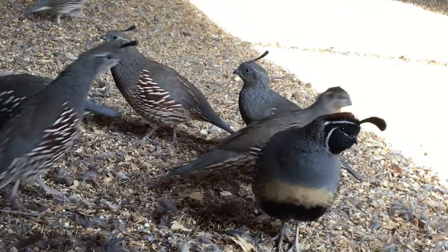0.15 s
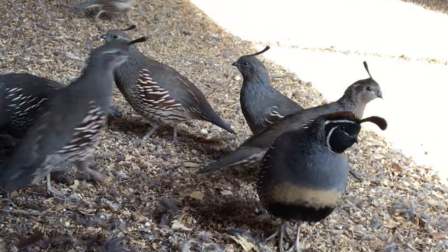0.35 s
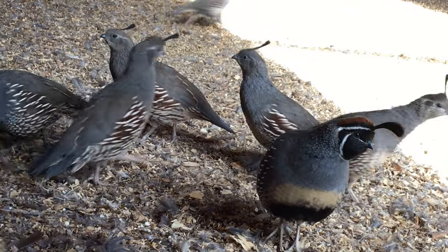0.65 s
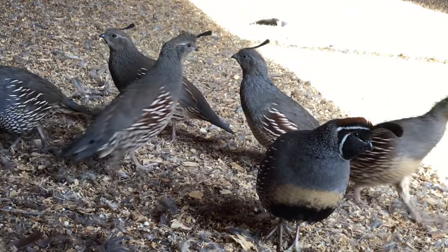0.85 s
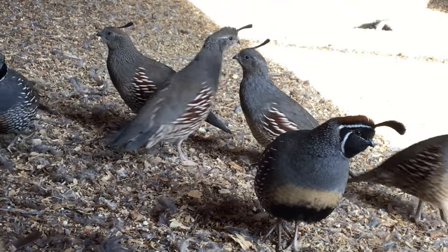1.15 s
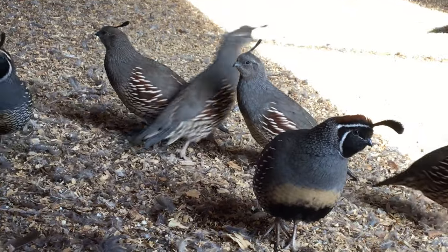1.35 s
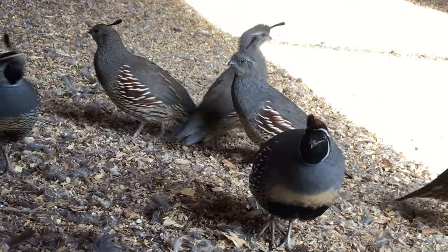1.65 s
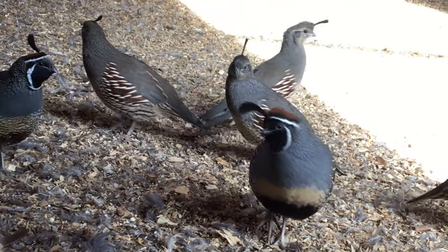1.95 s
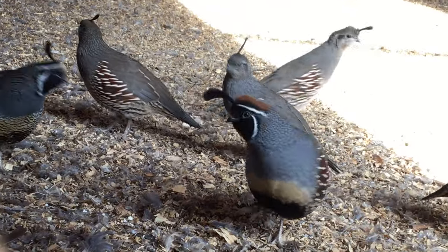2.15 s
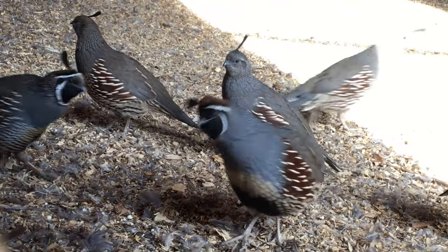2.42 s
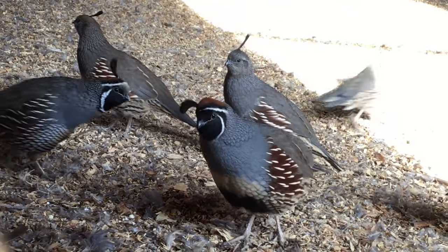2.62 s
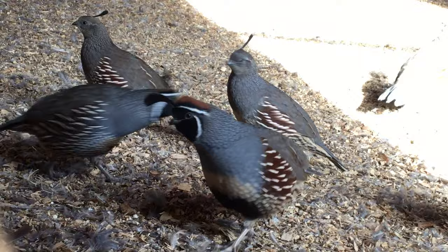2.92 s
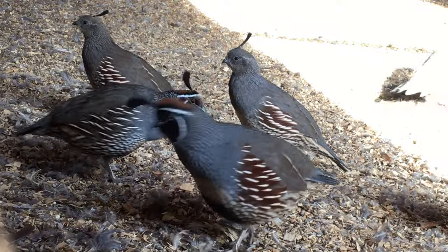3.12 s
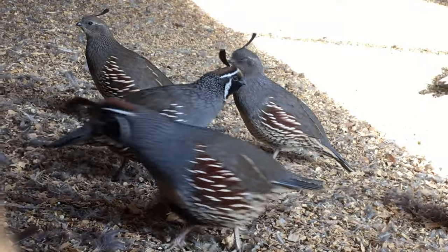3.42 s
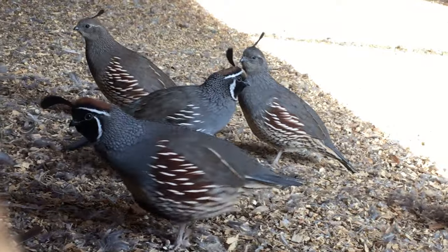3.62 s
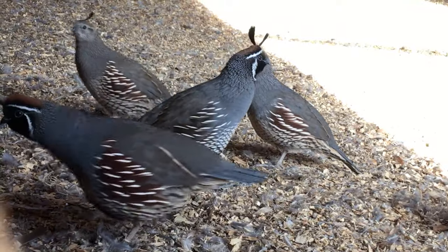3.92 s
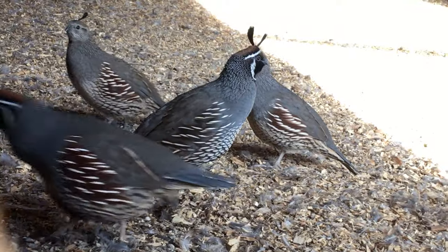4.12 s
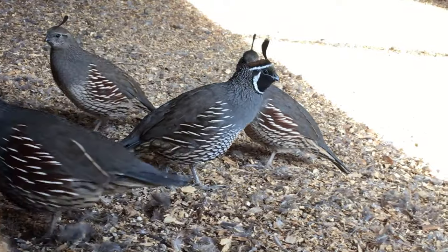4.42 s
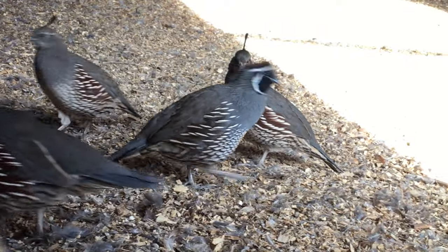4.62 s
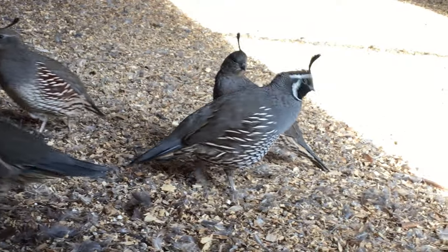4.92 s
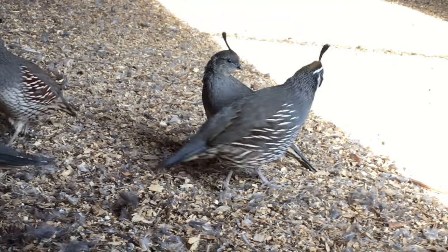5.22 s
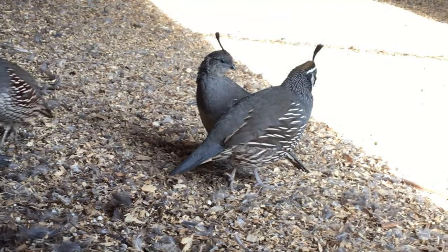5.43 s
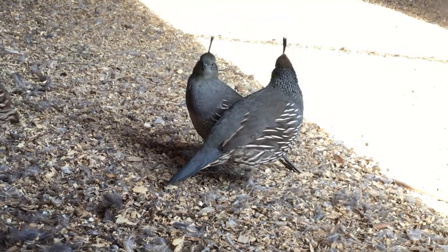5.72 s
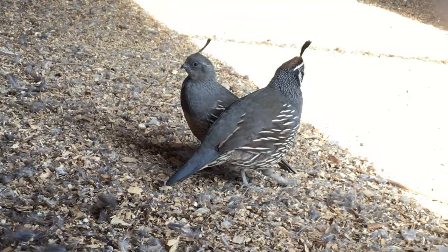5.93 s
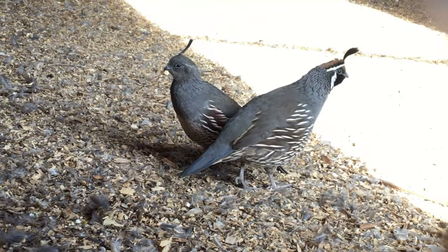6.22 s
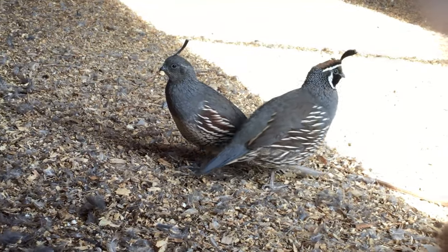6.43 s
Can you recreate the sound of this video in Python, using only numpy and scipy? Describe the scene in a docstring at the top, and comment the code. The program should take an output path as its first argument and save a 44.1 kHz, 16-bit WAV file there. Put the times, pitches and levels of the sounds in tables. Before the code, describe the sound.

Quail give nasal clucks, wails, yelps and harsh chips while stepping lightly on gravel, over a low rumble and hum.

```python
"""In a shelter, a covey of quail walks over gravel, above a low rumble and the hum of a far machine.
Each call is a source and a filter: a vibrating membrane makes harmonics, and throat and beak shape them.
The birds trade nasal clucks, climbing wails, two-humped yelps and faint squeaks; then one gives five
harsh chips that break up at their ends. Feet set pebbles ringing, near walls reflect calls and steps,
a few dull bumps sound, and a small bird whistles far off."""
import sys
import numpy as np
from scipy import signal
from scipy.fft import rfft, irfft, next_fast_len
from scipy.io import wavfile

SR = 44100
rng = np.random.default_rng(int(sys.argv[2]) if len(sys.argv) > 2 else 0)


def wav_record(signal):
    """Record a signal, one row per channel, as 16-bit PCM in the file named by sys.argv[1]."""
    frames = np.transpose(np.atleast_2d(signal))
    bounded = np.clip(frames, -1, 1)
    # unit amplitude maps onto the largest positive 16-bit level
    quanta = np.round(bounded * 32767).astype(np.int16)
    wavfile.write(sys.argv[1], SR, quanta)


N = 289719


# Wails: (time [s], length [s], start pitch [Hz], top pitch [Hz], bend of the climb [1 = straight],
# final drop [0-1], level [dB], softness [0-1], overtones [dB], beak ring [dB])
WAIL_NOTES = [(1.945, .198, 740.5, 871, 0.64, 0.067, -24.5, .02, -1.3, 4.5),
              (2.108, 0.17, 645, 768, 0.702, 0.44, -41.5, 0.97, -0.69, -15),
              (2.75, 0.18, 705, 869, .75, 0.32, -35, 0.72, 1.3, -40),
              (3.028, .222, 754.7, 927, 1.25, 0.338, -22.5, 0.014, -1, 6),
              (4.203, .243, 760, 961, 0.98, 0.37, -22, 0.034, -1.9, 7.5)]

def wails(scoop_s=0.036, hold_s=0.047, drop_s=0.0351, swell_db=24.5, swell_s=0.031):
    """Tension sets pitch: the voice scoops up, swells as it climbs, and drops off the top."""
    out = np.zeros(N)
    for start, length, from_hz, top_hz, bend, drop, db, softness, overtones_db, ring_db in WAIL_NOTES:
        t = np.arange(0, length, 1 / SR)
        climb = np.interp(t, [scoop_s, length - hold_s], [0, 1]) ** bend
        arch = slack(t, scoop_s, drop_s, start_sag=0.35, end_sag=drop, squareness=1.9)
        pitch = (from_hz + (top_hz - from_hz) * climb) * arch
        level_db = db + effort(arch, softness) - swell_db * (1 - softness) * np.exp(-t / swell_s)
        add(out, start, voice(pitch, level_db, softness, overtones_db, ring_db, hoarse=0.01))
    return out


# Yelps, with crests and dip timed from the onset: (time [s], first crest [s], dip [s], second crest [s],
# length [s], first crest [Hz], dip [Hz], second crest [Hz], scoop [0-1], level [dB],
# second arch gain [dB], beak ring [dB])
YELP_NOTES = [(2.132, 0.034, 0.11, .21, .26, 812.7, 662, 743, 0.06, -25.5, -1.5, -3),
              (3.327, 0.053, 0.14, 0.2, 0.28, 874.3, 633, 758, 0.31, -21.5, -0.5, -0.5),
              (4.521, .054, .135, .178, .228, 885.4, 662, 732.6, 0.4, -20, -3, -4.5)]

def yelps():
    """Coupled pitch and level: a high arch sinks into a dip and lifts into a lower, weaker arch."""
    out = np.zeros(N)
    for (start, crest_s, dip_s, second_s, length, crest_hz, dip_hz, second_hz,
         scoop, db, second_db, ring_db) in YELP_NOTES:
        t = np.arange(0, length, 1 / SR)
        pitch = ease(t, [crest_s, dip_s, second_s], [crest_hz, dip_hz, second_hz])
        pitch *= slack(t, crest_s, length - second_s, start_sag=scoop, end_sag=0.209, squareness=3)
        level_db = db + effort(pitch / crest_hz, softness=0) + ease(t, [crest_s, second_s], [0, second_db])
        note = voice(pitch, level_db, softness=0, overtones_db=4, ring_db=ring_db, hoarse=0.016)
        add(out, start, note * fade(t, rise=0.012, fall=0.017))
    return out


# Clucks: (time [s], length [s], top pitch [Hz], level [dB], softness [0-1], beak ring [dB])
CLUCK_NOTES = [(1.714, 0.076, 795, -26.5, 0, -13), (1.927, 0.065, 601, -44, 1, -28),
               (1.991, .16, 439, -47.5, 1, -15), (2.555, 0.073, 705.4, -36.5, 0.73, -33),
               (2.788, .085, 768, -26.5, 0.15, -2), (3.018, 0.093, 604, -46, 1, -23),
               (3.106, 0.091, 568, -40.5, 0.64, -16), (3.979, .08, 774.6, -25.5, 0, -2)]

def clucks():
    """One pulse of tension: pitch and level rise and fall in a single short arch."""
    out = np.zeros(N)
    for start, length, hz, db, softness, ring_db in CLUCK_NOTES:
        t = np.arange(0, length, 1 / SR)
        arch = slack(t, length / 2, length / 2, start_sag=0.31, end_sag=0.31, squareness=2.1)
        level_db = db + effort(arch, softness)
        note = voice(hz * arch, level_db, softness, overtones_db=3.5, ring_db=ring_db, hoarse=0.033)
        add(out, start, note * fade(t, rise=0.02, fall=0.0024))
    return out


# Throat response with the beak wide open: (frequency [Hz], gain [dB])
OPEN_THROAT_RESPONSE = [(700, -7), (1050, -13.5), (1450, 2.5), (1900, -1), (2200, -2), (2700, -10.5),
                        (3300, -4.5), (3700, -22), (4400, -16.5), (5700, -27), (7000, -21), (8200, -35.5),
                        (11000, -34)]
# Harsh chips: (time [s], length [s], pitch [Hz], level [dB], opening glide [s], time to the break [s],
# pitch jump [0-1], overtone tilt [dB/octave], waver [0-1])
CHIP_NOTES = [(5.186, .15, 717.3, -31.5, .012, 0.094, .2, -0.5, 0.02),
              (5.457, 0.092, 722, -30, .0062, 0.061, .28, -1, .01),
              (5.692, 0.086, 720, -30.5, .0072, 0.062, 0.37, -0.5, .02),
              (5.957, 0.091, 682, -31, 0.0082, .062, 0.3, -1, .03),
              (6.28, 0.091, 659, -32.5, 0.0072, 0.048, 0.01, 2, 0.02)]

def chips(overshoot=0.58, rasp=0.016, broken_rasp=0.108, dying_db_per_s=230):
    """Voice break: each chip drops onto its pitch, holds it, then breaks into rough vibration, most with an
    upward crack in pitch."""
    out = np.zeros(N)
    for start, length, hz, db, glide_s, break_s, jump, tilt, waver in CHIP_NOTES:
        t = np.arange(0, length, 1 / SR)
        opening = np.exp(-(t / (1.1 * glide_s)) ** 2)
        broken = np.clip((t - break_s) / 0.0092 + 0.5, 0, 1)
        pitch = hz * (1 + overshoot * opening + jump * broken + waver * wander(len(t), rate_hz=84))
        freqs = harmonics(pitch, count=15)
        # the overtones come in as the beak opens and dull a little at the break
        treble_db = (tilt - 7 * opening - 1.5 * broken) * np.maximum(np.log2(freqs / 1500), 0)
        flicker_db = 3.2 * np.array([wander(len(t), rate_hz=70) for _ in freqs])
        gains_db = at_hz(OPEN_THROAT_RESPONSE, freqs) + treble_db + flicker_db
        roughness = rasp + broken_rasp * broken
        note = syrinx(pitch * (1 + roughness * wander(len(t), rate_hz=590)), gains_db)
        flutter = 1 + 3 * roughness * wander(len(t), rate_hz=920)
        level_db = db - dying_db_per_s * np.maximum(t - break_s, 0)
        add(out, start, note * flutter * from_db(level_db) * fade(t, rise=2.55 * glide_s, fall=0.009))
    # the open throat cuts what lies below the voice
    return signal.sosfilt(signal.butter(4, 560, "high", fs=SR, output="sos"), out)


# Faint squeaks of other birds: (time [s], length [s], start pitch [Hz], end pitch [Hz], level [dB],
# overtones [dB], hoarseness [0 = clear])
SQUEAK_NOTES = [(0.035, 0.0694, 848, 971, -43.5, 18.5, 1.03), (0.097, 0.11, 772, 616, -48, 9, 0.33),
                (0.41, 0.08, 749, 974, -48, 7, 0.47), (0.644, 0.1, 941, 955, -52, 10, 0.24),
                (3.79, 0.099, 1016, 641, -35.5, 10, 0.11)]

def squeaks(slide_share=0.7, edge_db=12):
    """Frequency glide: a thin voice slides to a new pitch while it swells and fades."""
    out = np.zeros(N)
    for start, length, from_hz, to_hz, db, overtones_db, hoarse in SQUEAK_NOTES:
        t = np.arange(0, length, 1 / SR)
        pitch = ease(t, [0, slide_share * length], [from_hz, to_hz])
        level_db = db - edge_db * (2 * t / length - 1) ** 2
        note = voice(pitch, level_db, softness=0, overtones_db=overtones_db, ring_db=-21, hoarse=hoarse)
        add(out, start, note)
    return out


# Throat response in a nasal call: (frequency [Hz], gain [dB])
NASAL_THROAT_RESPONSE = [(800, -3.5), (950, -1.5), (1300, 1), (1600, 9), (1900, 0), (2200, -9.5),
                         (2500, -22.5), (2750, -24), (3050, -27.5), (3450, -28), (4400, -33.5), (5200, -33),
                         (7000, -35), (8000, -46)]

def voice(pitch, level_db, softness, overtones_db, ring_db, hoarse, beak_hz=6040, beak_width_hz=396):
    """Source and filter: a throat resonance lifts the second harmonic; the beak rings high above it."""
    t = np.arange(len(pitch)) / SR
    freqs = harmonics(pitch, count=12)
    beak = np.exp(-((freqs - beak_hz) / beak_width_hz) ** 2 / 2)
    upper = np.clip(np.log2(freqs / 1700) * 2, 0, 1)
    gains_db = at_hz(NASAL_THROAT_RESPONSE, freqs) + (14.5 + ring_db) * beak
    gains_db += (overtones_db + 6 * softness) * upper
    gains_db[0] += 14 * softness  # a soft voice favours its fundamental
    # a note is brightest where it is pushed hardest, and its overtones flicker
    weakening_db = np.minimum(level_db - level_db.max() + 3, 0)
    gains_db += 1.1 * weakening_db * np.clip(np.log2(freqs / 2400), 0, 1)
    gains_db += 3.5 * upper * np.array([wander(len(t), rate_hz=77) for _ in freqs])
    # the membrane rasps as its tension lets go
    letting_go = np.clip(-np.gradient(pitch) * SR / 10000, 0, 1)
    roughness = 0.0035 + 0.19 * hoarse + 0.045 * letting_go
    note = syrinx(pitch * (1 + roughness * wander(len(t), rate_hz=1530)), gains_db)
    # the level dips as the second harmonic passes 1787 Hz
    dip_db = 5 * np.exp(-((2 * pitch - 1787) / 43) ** 2)
    shimmer_db = 1.53 * wander(len(t), rate_hz=32.4)
    return note * from_db(level_db - dip_db + shimmer_db) * fade(t, rise=0.0053, fall=0.0042)


def syrinx(pitch, gains_db):
    """Periodic vibration: one membrane gives a sum of phase-locked harmonics, scaled to rms 1."""
    gains = from_db(gains_db)
    phase = 2 * np.pi * np.cumsum(pitch) / SR
    orders = np.arange(1, len(gains) + 1)[:, None]
    return np.sum(gains * np.sin(orders * phase), axis=0) / np.sqrt(np.sum(gains ** 2, axis=0) / 2)


def slack(t, rise_s, fall_s, start_sag, end_sag, squareness):
    """Membrane tension: the share of its pitch that a voice reaches as it tightens and lets go."""
    tighten = 1 - start_sag * np.clip(1 - t / rise_s, 0, 1) ** squareness
    release = 1 - end_sag * np.clip(1 - (t[-1] - t) / fall_s, 0, 1) ** squareness
    return tighten * release


def effort(pitch_share, softness, db_per_octave=33):
    """Vocal effort: the level [dB] rises with pitch, less so in a soft voice."""
    return db_per_octave * (1 - 0.59 * softness) * np.log2(pitch_share)


def shuffles(per_s=2.9, click_db=-57, crunch_db=-58.5, spread_db=2.5):
    """Random arrivals: light steps fall at chance moments, as rows like those of CLEAR_STEPS."""
    count = round(per_s * N / SR)
    levels_db = [click_db, crunch_db] + spread_db * rng.standard_normal((count, 2))
    return np.column_stack([rng.uniform(0, N / SR, count), levels_db])


# Resonances of a kicked pebble: (frequency [Hz], bandwidth [Hz])
PEBBLE_LOW, PEBBLE_HIGH = [(3300, 2900), (5400, 2600)], [(8000, 2100), (9700, 3100)]
# The clearest steps: (time [s], relative click level [dB], relative crunch level [dB])
CLEAR_STEPS = [(0.2284, -40, -54), (0.2738, -44, -53), (1.1396, -49, -49.5), (1.1494, -47, -46.5),
               (1.4314, -60, -50.5), (1.622, -38, -51), (1.8387, -57, -55), (2.0343, -45, -54),
               (2.2552, -62, -45.5), (2.341, -39.5, -68), (2.6565, -49, -54.5), (3.4388, -33, -49),
               (3.8144, -56, -50.5), (3.9975, -57, -43.5), (4.1081, -51, -52), (4.4962, -35, -57),
               (4.7052, -44, -49.5), (4.9766, -36, -61), (5.1732, -34, -55), (5.7209, -25.5, -54),
               (5.7821, -30, -46), (5.8646, -21.5, -72), (6.0807, -47, -48.5), (6.4003, -41, -46)]

def gravel(click_s=0.0011, crunch_s=0.009, grain_db=3):
    """Impact excitation: a step's click rings the high pebble modes, its crunch of contacts the low."""
    crunches, clicks = np.zeros(N), np.zeros(N)
    t = np.arange(0, 0.05, 1 / SR)
    onset = 1 - np.exp(-t / 0.00077)
    for start, click_db, crunch_db in [*CLEAR_STEPS, *shuffles()]:
        grains = rng.standard_normal(len(t)) * from_db(grain_db * wander(len(t), rate_hz=3900)) * onset
        add(crunches, start, grains * np.exp(-t / crunch_s) * from_db(crunch_db))
        add(clicks, start, grains * np.exp(-t / click_s) * from_db(click_db - 4))
    low = sum(resonate(crunches, hz, width) for hz, width in PEBBLE_LOW)
    high = sum(resonate(clicks, hz, width) for hz, width in PEBBLE_HIGH)
    return 2 * signal.sosfilt(signal.butter(2, 11500, fs=SR, output="sos"), low + high)


# Reflections from the near walls: (delay [ms], gain [dB])
WALL_REFLECTIONS = [(4.3, -22.5), (7.75, -12.5), (13.4, -13.5)]

def shelter(x, tail_db, t60_s=0.36, dull_hz=5000, build_s=0.0071):
    """Comb filtering: wall reflections interfere with the direct sound; a short diffuse tail follows."""
    t = np.arange(0, 0.6, 1 / SR)
    early = sum(from_db(db) * np.sinc((t - ms / 1000) * SR) for ms, db in WALL_REFLECTIONS)
    tail = rng.standard_normal(len(t)) * from_db(-60 * t / t60_s) * np.clip(t / build_s, 0, 1) ** 2
    tail /= np.sqrt(np.sum(tail ** 2))
    tail = signal.sosfilt(signal.butter(1, dull_hz, fs=SR, output="sos"), tail)
    return x + signal.fftconvolve(x, early + from_db(tail_db) * tail)[:N]


# Dull bumps: (time [s], frequency [Hz], level [dB], decay time [s])
THUDS = [(0.778, 153, -41, 0.05), (0.818, 114.6, -36.5, 0.036), (0.859, 185, -25.5, 0.0097),
         (2.531, 74, -27, 0.01), (5.617, 83, -32, 0.022)]

def bumps():
    """Damped oscillation: each soft, low thud dies in a few cycles."""
    out = np.zeros(N)
    t = np.arange(0, 0.2, 1 / SR)
    for start, hz, db, decay_s in THUDS:
        thud = np.sqrt(2) * np.sin(2 * np.pi * hz * t) * np.exp(-t / decay_s)
        add(out, start, from_db(db) * thud * fade(t, rise=0.004, fall=0.02))
    return out


# Far whistles: (time [s], length [s], start pitch [Hz], end pitch [Hz], level [dB])
WHISTLE_NOTES = [(.15, 0.073, 5300, 4770, -70), (.475, .13, 5170, 4950, -67), (.48, 0.048, 5870, 5560, -63),
                 (1.16, .08, 5100, 4900, -71), (1.265, 0.067, 3184, 3180, -62),
                 (1.337, 0.04, 3180, 3160, -63), (1.43, 0.14, 5130, 4900, -75)]

def whistles(waver=0.013, twitter_db=4):
    """Modulated pure tone: a distant small bird glides down, wavering in pitch and level."""
    out = np.zeros(N)
    for start, length, from_hz, to_hz, db in WHISTLE_NOTES:
        t = np.arange(0, length, 1 / SR)
        pitch = np.geomspace(from_hz, to_hz, len(t)) * (1 + waver * wander(len(t), rate_hz=500))
        twitter = from_db(db + twitter_db * wander(len(t), rate_hz=93))
        add(out, start, twitter * syrinx(pitch, gains_db=[[0]]) * fade(t, rise=0.014, fall=0.02))
    return out


# Spectrum of the outdoor noise: (frequency [Hz], relative density [dB])
AIR_SPECTRUM = [(20, -12), (45, -3), (70, 3.5), (115, -2.5), (190, -6), (300, -16.5), (500, -19.5),
                (900, -19), (1400, -21.5), (2000, -30), (3000, -36.5), (5000, -39.5), (8000, -40),
                (12500, -41.5)]
# Slow drift of its two bands: (time [s], rumble gain [dB], hiss gain [dB])
AIR_DRIFT = [(0, -5.5, -0.5), (.8, -3, -2.5), (1.2, -2.5, 2), (2.2, 2, -0.5), (3.5, -1.5, 1), (5, -0.5, 1),
             (6.57, -2.5, 1.5)]

def outdoor_air(level_db=-42.5, split_hz=300, sway_db=1):
    """Spectrally shaped noise: a low rumble and a soft hiss drift separately in level."""
    size = next_fast_len(N)
    colour = from_db(at_hz(AIR_SPECTRUM, np.arange(size // 2 + 1) * SR / size))
    air = rms_one(irfft(rfft(rng.standard_normal(size)) * colour, size)[:N])
    rumble = signal.sosfiltfilt(signal.butter(2, split_hz, fs=SR, output="sos"), air)
    hiss = air - rumble
    t = np.arange(N) / SR
    times, rumble_db, hiss_db = np.transpose(AIR_DRIFT)
    rumble *= from_db(np.interp(t, times, rumble_db) + sway_db * wander(N, rate_hz=7.5))
    hiss *= from_db(np.interp(t, times, hiss_db))
    return from_db(level_db) * (rumble + hiss)


def machine_hum(hz=117, level_db=-50):
    """Frequency and amplitude modulation: the one low tone of a far machine wavers at random."""
    pitch = hz * (1 + 0.02 * wander(N, rate_hz=7))
    flutter = 1 + 0.25 * wander(N, rate_hz=54)
    return from_db(level_db) * flutter * np.sin(2 * np.pi * np.cumsum(pitch) / SR)


def from_db(db):
    """Decibels as an amplitude ratio."""
    return 10 ** (np.asarray(db) / 20)


def rms_one(x):
    """Normalisation to unit power."""
    return x / np.sqrt(np.mean(x ** 2) + 1e-20)


def at_hz(points, hz):
    """Interpolation of a spectrum [dB] on a log-frequency axis."""
    freqs, db = np.transpose(points)
    return np.interp(np.log(np.maximum(hz, 1)), np.log(freqs), db)


def harmonics(pitch, count):
    """Harmonic series: whole multiples of the pitch, one row each."""
    return np.arange(1, count + 1)[:, None] * pitch


def add(out, start, sound):
    """Superposition: a sound joins the mix at its start time [s]."""
    i = max(round(start * SR), 0)
    out[i:i + len(sound)] += sound[:max(N - i, 0)]


def wander(size, rate_hz):
    """Smooth random modulation: noise through a settled two-pole low-pass, with rms near 1."""
    w = np.sqrt(2) * np.pi * rate_hz / SR
    poles = [1, -2 * np.exp(-w) * np.cos(w), np.exp(-2 * w)]
    smooth = signal.lfilter([1], poles, rng.standard_normal(size + 5000))
    return rms_one(smooth[2000:])[:size]


def resonate(x, hz, width_hz):
    """Two-pole resonance with unit gain at its peak."""
    r = np.exp(-np.pi * width_hz / SR)
    zeros = np.array([1, 0, -1]) * (1 - r * r) / 2
    poles = [1, -2 * r * np.cos(2 * np.pi * hz / SR), r * r]
    return signal.lfilter(zeros, poles, x + 1e-18)


def fade(t, rise, fall):
    """Amplitude envelope with a quarter-sine rise and fall [s]."""
    attack = np.sin(np.pi / 2 * np.clip(t / rise, 0, 1))
    release = np.sin(np.pi / 2 * np.clip((t[-1] - t) / fall, 0, 1))
    return attack * release


def ease(t, times, values):
    """Raised-cosine interpolation from each value to the next."""
    indices = np.arange(len(times))
    step = np.interp(t, times, indices)
    return np.interp(np.floor(step) + np.sin(np.pi / 2 * (step % 1)) ** 2, indices, values)


def scene():
    """Direct-to-reverberant ratio: the farther birds carry more of the shelter's diffuse tail."""
    near = shelter(clucks() + wails() + yelps() + squeaks(), tail_db=-13)
    feet = shelter(gravel(), tail_db=-17)
    farther = shelter(chips() + whistles(), tail_db=-10.5)
    return (near + feet + farther + bumps() + outdoor_air() + machine_hum())[None]


def record(dry, cutoff_hz=12500):
    """Band limiting: a steep elliptic low-pass cuts the highest treble."""
    return signal.sosfilt(signal.ellip(12, 0.1, 80, cutoff_hz, fs=SR, output="sos"), dry)


dry = scene()
out = record(dry)
wav_record(out)
```